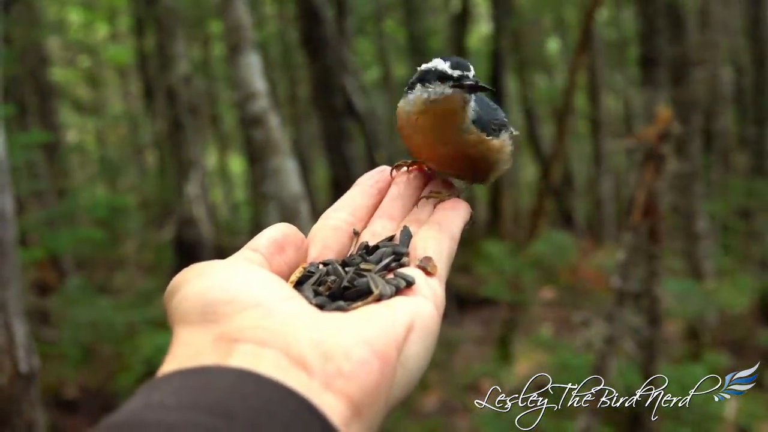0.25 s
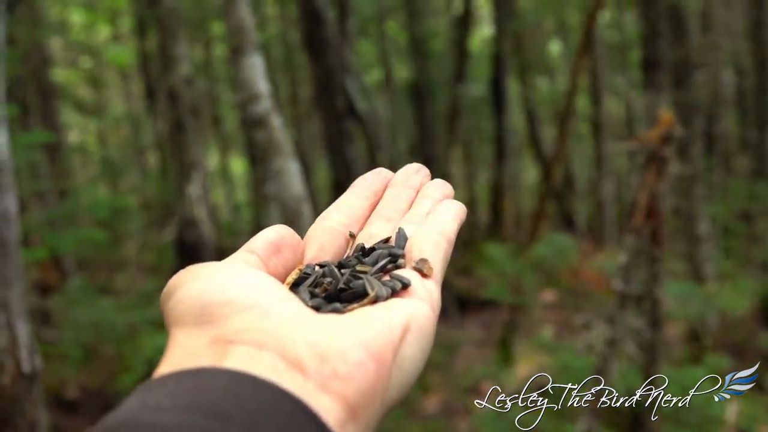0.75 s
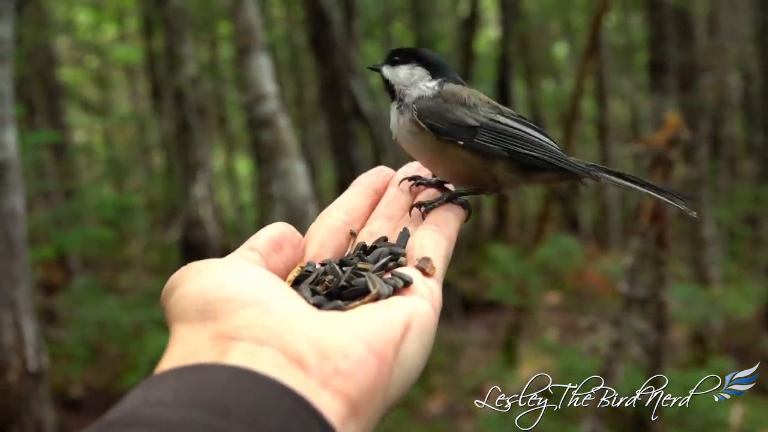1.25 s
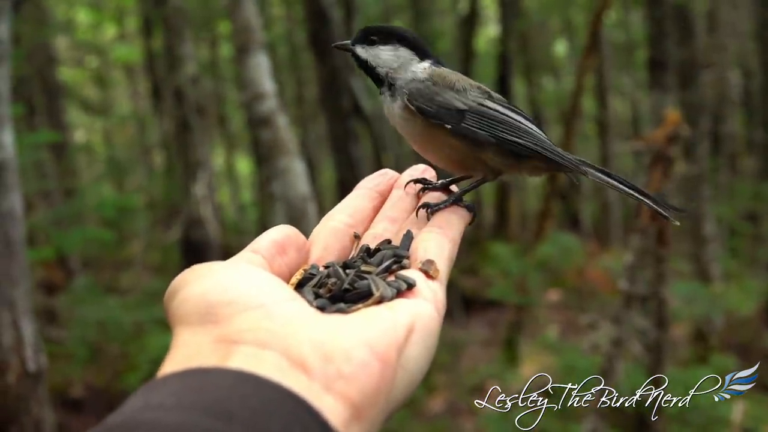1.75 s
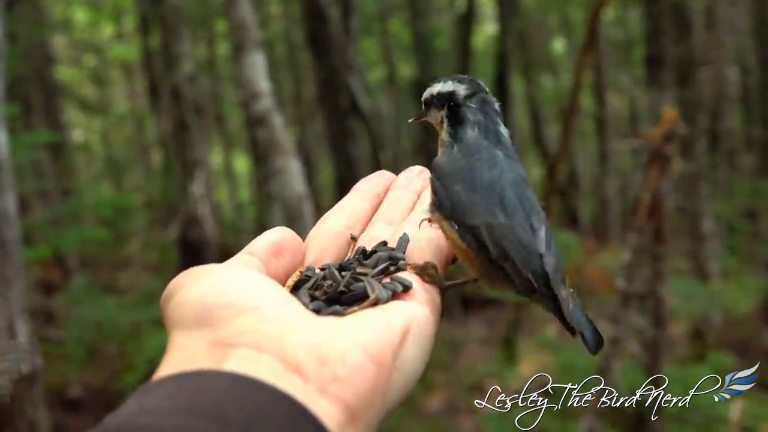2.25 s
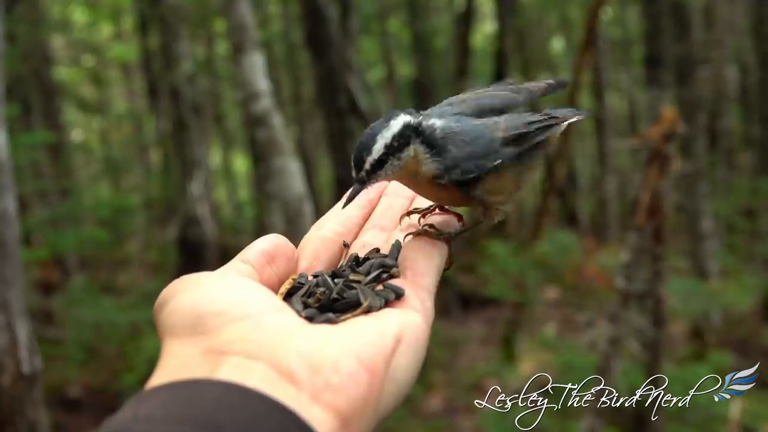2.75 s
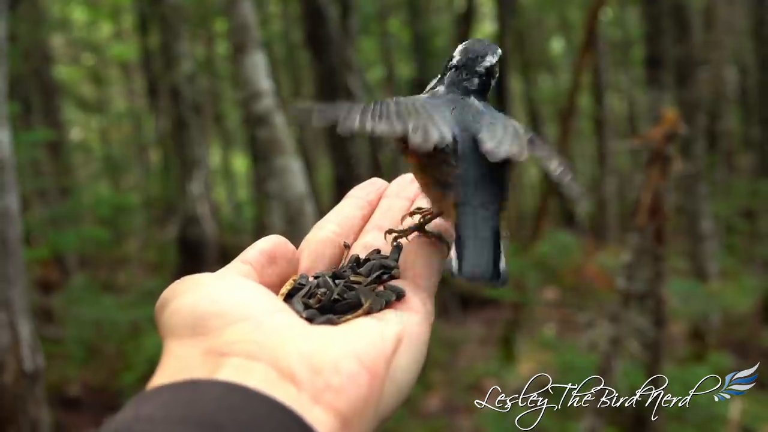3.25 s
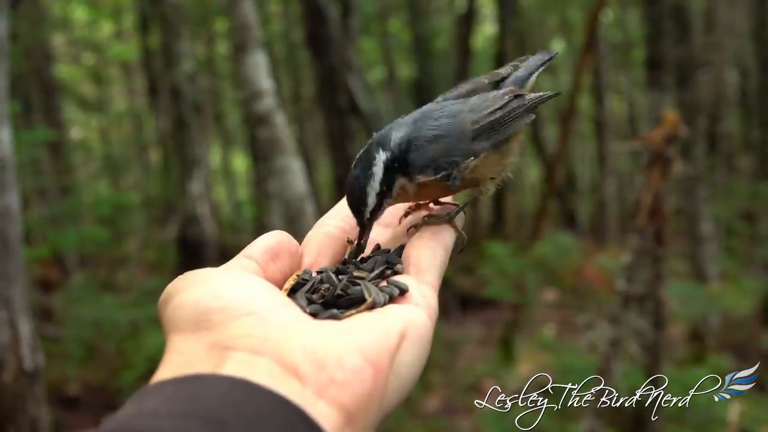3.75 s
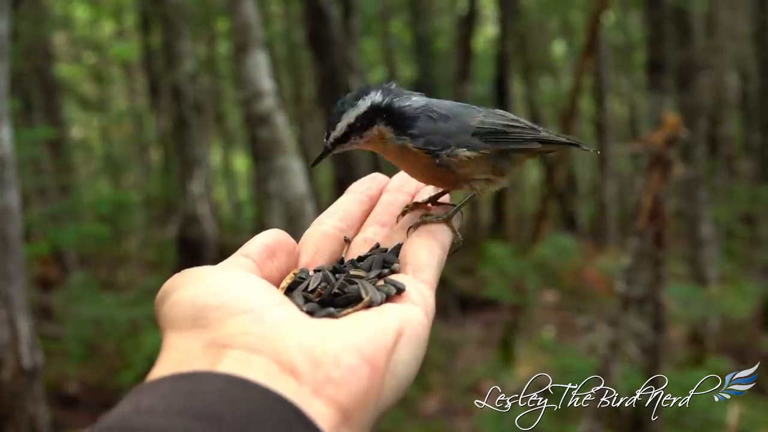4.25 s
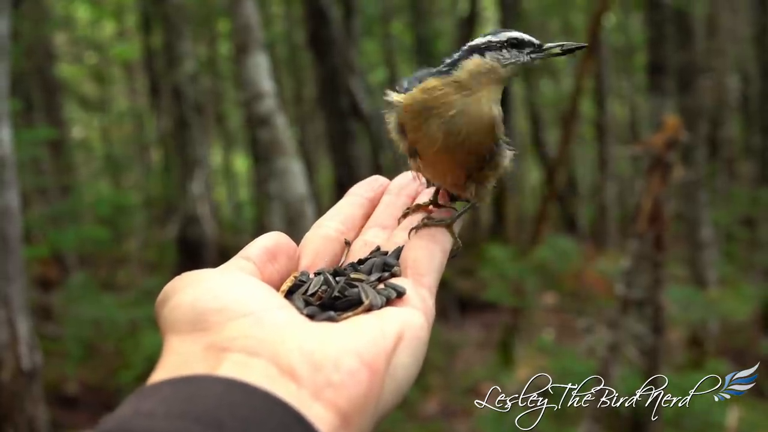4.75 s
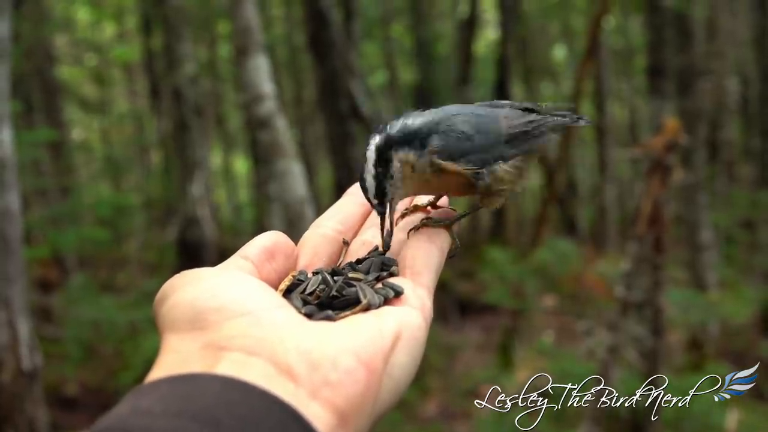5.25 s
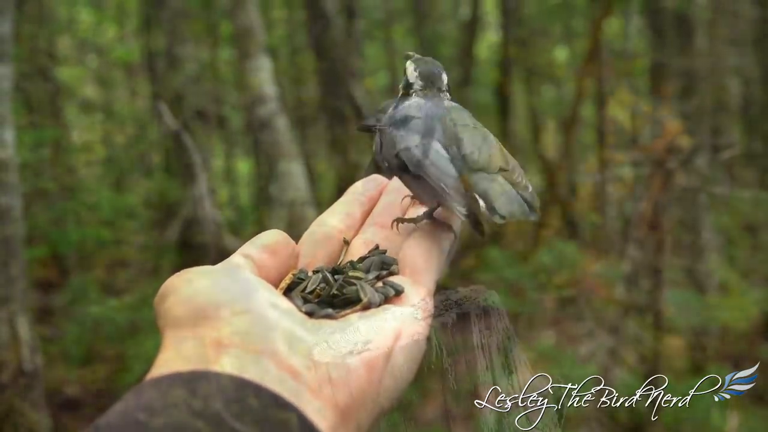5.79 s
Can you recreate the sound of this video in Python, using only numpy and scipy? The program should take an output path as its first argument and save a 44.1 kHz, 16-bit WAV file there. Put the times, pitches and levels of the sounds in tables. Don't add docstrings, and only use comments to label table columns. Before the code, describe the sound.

A quiet wood, recorded close, with faint leaves and a low distant traffic hum that dwindles toward the end. Soft nasal toots come at 0.1, 0.45 and 0.8 seconds, with light wing flutters and two small beak taps on seed near 0.7. From 1.0 to 1.5 three louder notes sound, the last strongest, while a farther bird on the left starts a quick, steady run of similar notes, lasting until about 5. Crisp feather snaps and rustling cluster around 2.0, then a soft low thump of landing at 2.4. A very close, dry, bright call hits at 2.55; wings flick near 2.8. More close calls follow at 3.2, 3.4, 4.1, 4.6 and 4.9, then weaker ones at 5.3 and 5.6, with a soft seed tap at 5.2. A faint thin whistle hides around 1.7 and 4.7. A last faint call comes near 5.9.

```python
import sys
import numpy as np
from scipy import signal
from scipy.fft import rfft, irfft
from scipy.io import wavfile
from scipy.ndimage import uniform_filter1d, map_coordinates

SR = 44100
rng = np.random.default_rng(int(sys.argv[2]) if len(sys.argv) > 2 else 0)


def decibels_to_gain(level_db):
    exponent = np.asarray(level_db, float) / 20
    return 10 ** exponent


def file_out(sig):
    cols = np.atleast_2d(sig).T
    lim = np.clip(cols, -1, 1)
    pcm = np.round(lim * 32767).astype(np.int16)
    wavfile.write(sys.argv[1], SR, pcm)


N = 265570

# start_s, length_s, level_db, pitch_hz (highest), beak_hz (resonance)
ON_HAND = [
    (2.559, 0.0526, -23, 509.8, 4216),
    (3.167, 0.0501, -26.5, 519.8, 4635),
    (3.436, 0.05295, -25, 520.8, 4513),
    (4.066, 0.04594, -26, 524.2, 4223),
    (4.597, 0.04485, -27.5, 524.3, 4215),
    (4.909, 0.04674, -29.5, 515.5, 4148),
    (5.266, 0.04517, -34.5, 521.5, 4010),
    (5.637, 0.0513, -37.5, 529.5, 4167),
]
LEAVING = [
    (5.881, 0.058, -42.5, 498.9, 4230),
]
BESIDE = [
    (0.091, 0.0532, -35, 513.1, 4258),
    (0.448, 0.0491, -37.5, 525.3, 4500),
    (0.774, 0.06, -40.5, 501.8, 4500),
    (1.026, 0.0556, -28, 525.9, 4552),
    (1.268, 0.046, -29.5, 510.3, 4290),
    (1.523, 0.055, -24, 523.7, 4398),
]
HOARSE = [
    (.472, .03, -45, 423.5, 4000),
    (.806, 0.015, -52.5, 435, 4430),
]
# start_s, length_s, level_db, pitch_hz
IN_TREES = [(0.973, 0.0389, -45.5, 520.1), (1.084, 0.0472, -36.5, 499.1), (1.224, 0.0666, -37, 490.3),
            (1.386, 0.0576, -37.5, 498.9), (1.676, 0.049, -37.5, 500.7), (1.862, 0.053, -36, 495.8),
            (2.013, 0.0557, -38, 493.7), (2.17, 0.0537, -36.5, 509.3), (2.353, 0.0565, -37.5, 495),
            (2.734, 0.0535, -42, 489.3), (3.282, 0.0552, -47.5, 491.2), (3.351, 0.0491, -43, 482),
            (3.492, 0.044, -41, 509), (3.573, 0.0454, -44, 479.6), (3.728, 0.049, -42, 494.7),
            (3.828, 0.0432, -42, 501.7), (3.994, 0.06, -43.5, 490.2), (4.157, 0.042, -42, 502.6),
            (4.327, 0.0535, -43.5, 515.4), (4.473, 0.05, -42.5, 504.2), (4.646, 0.0388, -41.5, 509),
            (4.838, 0.0547, -44.5, 502), (4.996, 0.0365, -44, 503.9), (5.715, 0.0424, -58.5, 493.3),
            (5.793, 0.0383, -58, 498.8)]
# time_s, beak_hz
TREE_BEAK = [
    (2.3, 3814),
    (2.8, 4007),
    (4.5, 4076),
    (4.9, 3703),
]

CLIMB, TOP_LATE, SAG_BEND = .135, .05, 1.6
LIMP, LIMP_ENDS = .55, .4
HAND_RASP, SIDE_RASP, TREE_RASP, EDGE_RASP = .33, .48, .62, 2

# echo_db, near_trunks_db, rasp (0-1), roundness, flat_top, final_sag (share), beak_rise (share),
# windpipe_hz, low_edge_hz, top_edge_hz
HAND_BIRD = (-17, 6, HAND_RASP, 0.9, 0.9, 0.21, 0.08, 3600, 2500, 5600)
SIDE_BIRD = (-9.5, 9.1, SIDE_RASP, 0.997, 0.68, 0.2434, 0.0895, 3660, 2906.5, 5310)
TREE_BIRD = (-4, 8, TREE_RASP, 1.1, 0.4, 0.3, 0.08, 3300, 2900, 4850)
HOARSE_BIRD = (-5, 8, 1.1, 0.6, 1.2, .1, 0.05, 3800, 3200, 5600)
# throat_db, windpipe_db, breath_db, loudest_point (share of note), beak_glide (share), beak_lift (share)
HAND_POSE = (-11, -2.5, -29, .51, -.01, .085)
LEAVING_POSE = (-15, 1.5, -21, .53, .02, .1)
SIDE_POSE = (-16, -1, -35.5, 0.4889, 0, 0.1267)
TREE_POSE = (-22, 1, -40, .47, -.02, .11)
HOARSE_POSE = (-32, -8, -36, .45, 0.02, 0.08)
HAND_PAN_DB, SIDE_PAN_DB, TREE_PAN_DB = -2.3, 3.8, 6.8
OPEN_HZ, PIPE_LOSS_DB = 4500, 5
BREATH_GROWS, LOUD_DB = 0.56, -27.5
# freq_hz, level_db
BREATH = [(40, 6.5), (250, -1), (800, -22), (5000, -4), (7000, 13.5), (8400, 4), (9300, -4), (11500, 1.5),
          (14500, 1), (16000, -13.5)]

# freq_hz, decay_s (time to fall 60 dB)
TRUNKS = [(1000, .25), (2500, 0.56), (4000, 0.385), (6000, 0.57), (12000, .15)]
# freq_hz, level_db
CARRY = [(800, -22.5), (2200, -2.5), (3200, 0), (5000, -5), (7000, -8)]
TWIGS_DB, TWIGS_S = 4, .006

# freq_hz, level_db
FEATHER = [(600, -38), (1500, -7.5), (4000, 3), (8000, -1), (12000, 1), (16000, -4.5)]
# time_s, peak_db, pan_db (left minus right), dullness_db
SNAPS = [(0.449, -55, -2.5, 20.5), (1.0286, -58, 3.5, 0.35), (1.9217, -48.5, -4.5, -3), (1.964, -46, 2, 15),
         (2.0318, -43.5, 4, 1.5), (2.0395, -37.5, 4, -7), (2.171, -49, 2, 12), (2.3024, -59.5, -11.5, 18),
         (2.468, -47.5, -8.5, -7), (2.7382, -52, -3, 17.02), (2.8907, -49, -6.5, -12),
         (2.918, -55, -2.5, -12.5), (3.1468, -55.5, 2.4, 8), (3.7399, -52.5, 4, 9),
         (3.8164, -57.5, -0.94, 21), (3.8624, -63, 2, 15.5), (4.1565, -56.5, 3.5, -7),
         (4.7025, -57, 3, 4.5), (4.7561, -64.5, 3.5, 9), (0.164, -53.5, -2, -12), (0.237, -53.5, 0, 0.5),
         (2.813, -43, -6.5, -28.5)]
# first_s, length_s, peak_db, pan_db (left minus right), dullness_db
FLUTTERS = [
    (0.067, .046, -51, -3.1, 0.5),
    (0.2793, .092, -52.5, -2.1, 5.5),
    (0.6306, .092, -51.5, -16.1, 4),
    (1.0455, .046, -44, 1, 1.5),
    (1.969, .138, -51.5, 3.5, 5.97),
    (2.752, .046, -43.5, -9, -6.5),
    (4.465, .046, -62.5, 1, 4.5),
    (5.404, .092, -63, 0.95, 6.5),
]
WINGBEAT_S, BEAT_FADE_DB, SNAP_S = .0459, 1.04, 0.00183
# time_s, peak_db, pitch_hz
TAPS = [
    (0.6738, -36, 1580),
    (0.7223, -39.5, 1700),
    (5.197, -48.5, 1434),
    (6.01, -56, 3390),
]
# time_s, peak_db, pitch_hz, half_width_s
THUMPS = [
    (2.419, -32, 175, .006),
    (2.4195, -44, 330, .003),
    (2.322, -52, 340, .004),
]

# start_s, length_s, level_db, pitch_hz, spread_hz
WHISTLES = [
    (4.65, .17, -68, 7500, 550),
    (1.7, .17, -68, 6900, 600),
]
# start_s, length_s, level_db, pitch_hz
DRONES = [
    (1.575, .5, -62.5, 633),
    (2.55, 0.46, -80.5, 169.8),
]
# freq_hz, level_db
TRAFFIC = [(15, -66), (25, -11.5), (134, -27), (271, -12), (397, -6), (475, -5), (816, 1), (1610, -5.5),
           (2220, -10), (2660, -22), (3000, -19.5), (3900, -51), (6600, -120)]
# time_s, level_db of the traffic
FADE = [
    (0.0, -58),
    (0.44, -59.5),
    (0.85, -55.5),
    (1.31, -59.5),
    (1.84, -57),
    (4.71, -67.5),
    (5.31, -71),
    (5.45, -74.5),
    (6.02, -79.5),
]
# freq_hz, level_db
LEAVES = [(1500, -43), (2500, 3), (4500, 4.5), (7000, -2), (9000, -9.5), (12000, -14.5), (16000, -15.5)]
LEAVES_DB, LEAVES_FOLLOW = -62, 1.1
LINGER_DB, LINGER_T60_S = -34.5, 1
# freq_hz, level_db
PLUMAGE = [(2000, -30), (5000, -8.5), (9000, 1.5), (14000, 0), (15300, -6), (16000, -12)]
PLUMAGE_DB, PLUMAGE_FOLLOW = -74.5, 0.71
# middle_s, half_length_s, level_db
RUSTLES = [
    (0.347, 0.07, -84.5),
    (0.807, 0.133, -74),
    (1.073, 0.074, -65.5),
    (1.289, 0.102, -66),
    (2.038, .14, -63),
    (2.312, 0.223, -72),
    (2.824, .16, -67.5),
    (3.209, 0.125, -73.5),
    (4.195, 0.333, -91.5),
]
# freq_hz, likeness (0-1)
ALIKE = [(60, 1), (180, 1), (550, 0.839), (1650, 0.56), (4970, 0.81), (15000, 0.04)]


def along(points, hz):
    f, v = np.transpose(points)
    return np.interp(np.log(hz + 1), np.log(f + 1), v)


def unit(x):
    return x / np.sqrt(np.mean(x ** 2) + 1e-20)


def add(track, sound, s):
    part = track[:, max(round(s * SR), 0):][:, :sound.shape[-1]]
    part += sound[..., :part.shape[1]]


def sides(pan_db):
    return decibels_to_gain(np.array([[pan_db / 2], [-pan_db / 2]]))


def peak(f, centre_hz, width_hz):
    return 1j * f * width_hz / (centre_hz ** 2 - f ** 2 + 1j * f * width_hz)


def wander(points, places, order=3):
    return map_coordinates(rng.standard_normal(points), [places], order=order)


def rush(spectrum, patchy_db):
    hz, _, z = signal.stft(rng.standard_normal((2, N + 512)), SR, nperseg=512)
    patches = uniform_filter1d(rng.standard_normal(z.shape[1:]), 6, axis=0)
    patches = unit(uniform_filter1d(patches, 10, axis=1))
    z = z * decibels_to_gain(along(spectrum, hz)[:, None] + patchy_db * patches)
    turn = np.arccos(np.clip(along(ALIKE, hz), 0, .9))[:, None] / 2
    mid, side = z * np.array([np.cos(turn), np.sin(turn)])
    return unit(signal.istft(np.array([mid + side, mid - side]), nperseg=512)[1][:, :N])


def air(birds):
    t = np.arange(N) / SR
    road_db = np.interp(t, *np.transpose(FADE))
    fade_db = road_db - road_db.max()
    traffic = decibels_to_gain(road_db + 2.0) * sides(2.41) * rush(TRAFFIC, patchy_db=1.5)

    dying = decibels_to_gain(-120 * t[:SR] / LINGER_T60_S) * (1 - np.exp(-t[:SR] / 0.1))
    linger = np.abs(signal.fftconvolve(np.mean(birds ** 2, axis=0), dying / dying.sum())[:N])
    breeze = decibels_to_gain(2 * (LEAVES_DB + LEAVES_FOLLOW * fade_db))
    leaves = np.sqrt(breeze + decibels_to_gain(2 * LINGER_DB) * linger) * rush(LEAVES, patchy_db=5.0)

    grain = map_coordinates(rng.exponential(size=N // 100 + 4), [np.arange(N) / 100], order=1)
    beats = wander(N // 900 + 4, np.arange(N) / 900)
    plumage = unit(decibels_to_gain(2.0 * grain + 3.8 * beats) * rush(PLUMAGE, patchy_db=3.0))
    shaking = decibels_to_gain(PLUMAGE_DB + PLUMAGE_FOLLOW * fade_db)
    for s, half, db in RUSTLES:
        shaking = shaking + decibels_to_gain(db) * np.exp(-((t - s) / half) ** 2)
    return traffic + leaves + shaking * plumage


def far_tones():
    out = np.zeros((2, N))
    engines = [row + (12,) for row in DRONES]
    for s, length, db, hz, spread_hz in WHISTLES + engines:
        count = round(length * SR)
        f = np.fft.rfftfreq(count, 1 / SR)
        shape = np.exp(-((f - hz) / spread_hz) ** 2)
        band = irfft(rfft(rng.standard_normal((2, count))) * shape, count)
        swell = np.sin(np.pi * (np.arange(count) / count) ** 0.506)
        add(out, decibels_to_gain(db) * unit(band) * swell, s)
    return out


def landings():
    out, t = np.zeros((2, N)), np.arange(-1500, 1500) / SR
    for s, db, hz, width in THUMPS:
        push = np.exp(-np.abs(t / width) ** 1.4)
        cycles = np.cos(2 * np.pi * hz * t + np.array([[.6], [1.2]]))
        add(out, decibels_to_gain(db) * push * cycles, s - 1500 / SR)
    return out


def snaps():
    beats = []
    for s, length, db, pan_db, dull_db in FLUTTERS:
        for k in range(1 + round(length / WINGBEAT_S)):
            beats.append((s + k * WINGBEAT_S, db - k * BEAT_FADE_DB, pan_db, dull_db))
    return SNAPS + beats


def feathers():
    out, t, hz = np.zeros((2, N)), np.arange(1024) / SR, np.fft.rfftfreq(1024, 1 / SR)
    snap = np.exp(-((t - .006) / SNAP_S) ** 2)
    swish = decibels_to_gain(-5.5) * (t > .006) * np.exp(-(t - .006) / .009) * np.cos(np.pi / 2 * t / t[-1])
    for s, db, pan_db, dull_db in snaps():
        burst = rng.standard_normal((2, 1024)) * (snap + swish)
        burst[1] = 0.17 * burst[0] + 0.84 * burst[1]
        colour = along(FEATHER, hz) + dull_db / (1 + (hz / 6000) ** 4)
        add(out, decibels_to_gain(db - 4.0) * sides(pan_db) * irfft(rfft(burst) * decibels_to_gain(colour)), s - .005)
    for s, db, tap_hz in TAPS:
        knock = rng.standard_normal(1024) * np.exp(-t / 0.00225)
        ring = irfft(rfft(knock) * peak(hz, tap_hz, 1130))
        add(out, decibels_to_gain(db + 3) * np.ones((2, 1)) * ring, s)
    return out


def twigs(x, share_db):
    t = np.arange(round(5 * TWIGS_S * SR)) / SR
    spray = rng.standard_normal((2, len(t))) * np.exp(-t / TWIGS_S)
    spray[1] = .6 * spray[0] + .8 * spray[1]
    spray *= decibels_to_gain(share_db) / np.linalg.norm(spray[0])
    spray[:, 0] = 1
    return signal.fftconvolve(x, spray, axes=1) / np.linalg.norm(spray[0])


def trunks(x, near_db, gap_s):
    hz, t, z = signal.stft(rng.standard_normal((2, SR * 2 // 5)), SR, nperseg=256)
    clumps = decibels_to_gain(2.8 * unit(uniform_filter1d(rng.standard_normal(len(t)), size=4)))
    fading = decibels_to_gain(-60 * t / along(TRUNKS, hz)[:, None]) + decibels_to_gain(near_db - 60 * t / 0.1814)
    z = z * decibels_to_gain(along(CARRY, hz)[:, None]) * fading * clumps * (1 - np.exp(-t / gap_s))
    wet = signal.fftconvolve(x[None], signal.istft(z, SR, nperseg=256)[1], axes=1)
    count = wet.shape[1]
    sway = wander(count // 300 + 4, np.arange(count) / 300, order=1)
    wet = wet * (1 + 0.05 * sway)
    return wet * np.linalg.norm(x) / np.linalg.norm(wet) * np.sqrt(2)


def note(length, pitch_hz, beak_hz, throat_db, pipe_db, breath_db, crest, glide, lift,
         rasp, roundness, flat, arch, rise, pipe_hz, low_hz, top_hz):
    count = round(length * 1.35 * SR)
    u = np.arange(count) / (length * 1.35 * SR)
    effort = np.sin(np.pi * u ** (np.log(.5) / np.log(np.clip(crest, .2, .8))))
    pitch_drift, level_drift = wander(40, 12 * u), wander(40, 12 * u)

    top = crest + TOP_LATE
    climb = CLIMB * np.clip(1 - u / top, 0, 1) ** SAG_BEND
    sag = arch * np.clip((u - top) / (1 - top), 0, 1) ** SAG_BEND
    rate = pitch_hz * (1 - climb - sag) * (1 + .004 * pitch_drift)
    turn = 2 * np.pi * np.cumsum(rate) / SR
    k = np.arange(1, 18)[:, None]
    f = k * rate

    beak = beak_hz * (1 + lift - rise * (1 - effort) + glide * (2 * u - 1))
    nasal = peak(f, beak, 511.7) - decibels_to_gain(pipe_db) * peak(f, pipe_hz, 763.5)
    nasal = nasal / (1 + (low_hz / f) ** 12) ** .5
    throat = decibels_to_gain(throat_db) * peak(f, 2080, 1230) / (1 + (900 / f) ** 6) ** .5
    edge = 1 / (1 + (f / top_hz) ** 16) ** .5 + decibels_to_gain(-17.5)
    tract = (nasal + throat) * edge

    wobble = np.array([wander(24, 20 * u, order=1) for _ in range(34)]).reshape(2, 17, count)
    wobble = rasp * (1 + EDGE_RASP * (1 - effort)) * wobble
    overtones = tract * (1 + wobble[0] + 1j * wobble[1]) * np.exp(1j * k * turn)
    voice = np.real(np.sum(overtones, axis=0))
    limp = LIMP * np.clip(1 - u / LIMP_ENDS, 0, 1) ** .5
    voice = voice * (1 + limp * np.cos(turn / 2 + 0.514))

    left, other = rng.standard_normal((2, count))
    colour = decibels_to_gain(breath_db + along(BREATH, np.fft.rfftfreq(count, 1 / SR)))
    breath = irfft(rfft([left, 0.985 * other - 0.09 * left]) * colour, count)
    breath = breath * (1 + np.cos(turn))
    swell = np.tanh(flat * effort ** (2 * roundness)) / np.tanh(flat)
    return unit(voice) * swell * decibels_to_gain(.6 * level_drift), breath * swell


def nuthatch(notes, pose, pan_db, echo_db, near_db, *voice_settings):
    out = np.zeros((2, N))
    throat_db, pipe_db, breath_db, *bearing = pose
    for s, length, db, pitch_hz, beak_hz in notes:
        pipe = pipe_db - PIPE_LOSS_DB * max(beak_hz - OPEN_HZ, 0) / 100
        hiss = breath_db + BREATH_GROWS * (db - LOUD_DB)
        voice, breath = note(length, pitch_hz, beak_hz, throat_db, pipe, hiss, *bearing, *voice_settings)
        voice, breath = decibels_to_gain(db + 1.5) * voice, decibels_to_gain(db + 1.5) * breath
        start = s - 0.13 * length
        direct = np.array([np.roll(voice, 1), voice])
        add(out, sides(pan_db) * twigs(direct, echo_db + TWIGS_DB), start)
        add(out, breath, start)
        echo = trunks(voice, near_db, gap_s=0.00785)
        add(out, decibels_to_gain(echo_db) * sides(0.9 * pan_db) * echo, start)
    return out


def scene():
    near = nuthatch(ON_HAND, HAND_POSE, HAND_PAN_DB, *HAND_BIRD)
    near = near + nuthatch(BESIDE, SIDE_POSE, SIDE_PAN_DB, *SIDE_BIRD)
    near = near + nuthatch(LEAVING, LEAVING_POSE, HAND_PAN_DB, *HAND_BIRD)
    answers = [row + (np.interp(row[0], *np.transpose(TREE_BEAK)),) for row in IN_TREES]
    far = nuthatch(answers, TREE_POSE, TREE_PAN_DB, *TREE_BIRD)
    far = far + nuthatch(HOARSE, HOARSE_POSE, SIDE_PAN_DB, *HOARSE_BIRD)
    birds = near + far
    return air(birds) + far_tones() + landings() + feathers() + birds


def low_pass(x):
    return signal.sosfilt(signal.butter(12, 15920, fs=SR, output="sos"), x)


def record(dry):
    hz = np.fft.rfftfreq(N, 1 / SR)
    narrow = irfft(rfft(dry) * (hz < 15850), N)
    return low_pass(narrow)


dry = scene()
out = record(dry)
file_out(out)
```